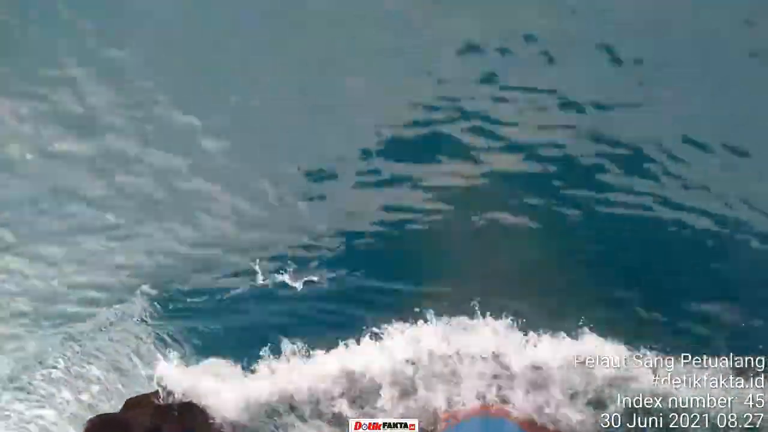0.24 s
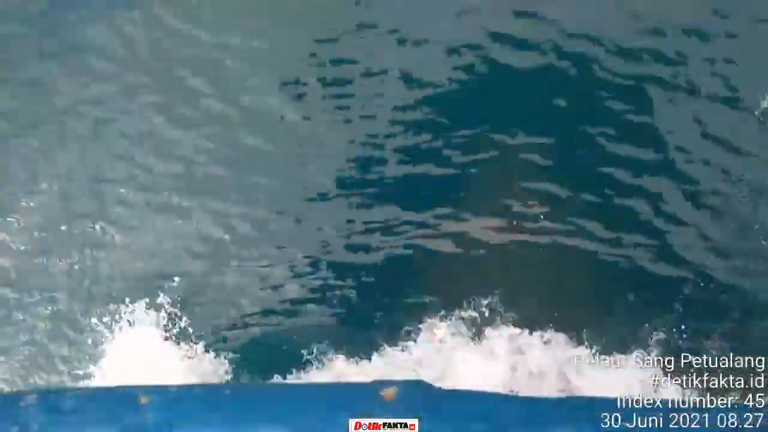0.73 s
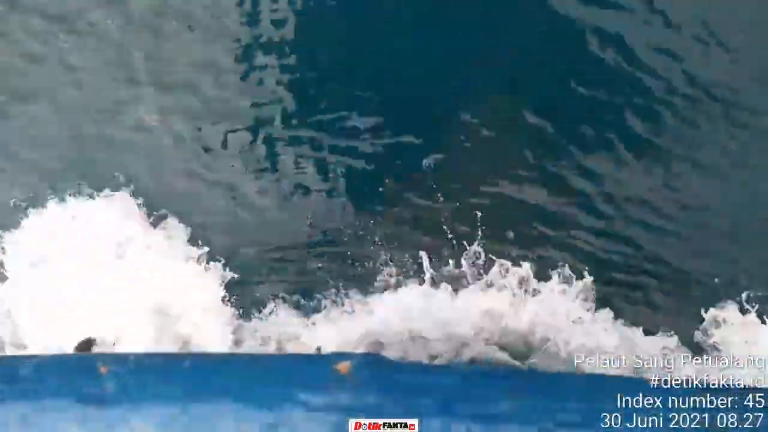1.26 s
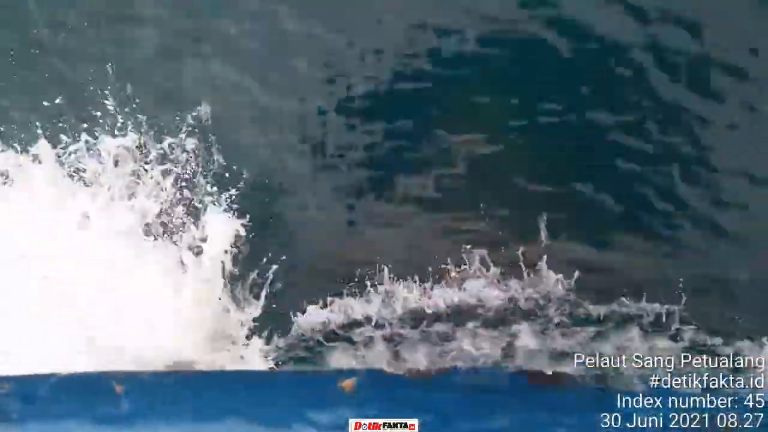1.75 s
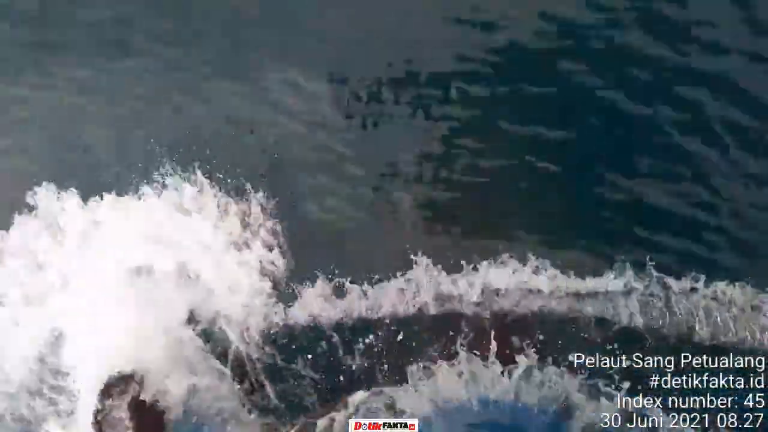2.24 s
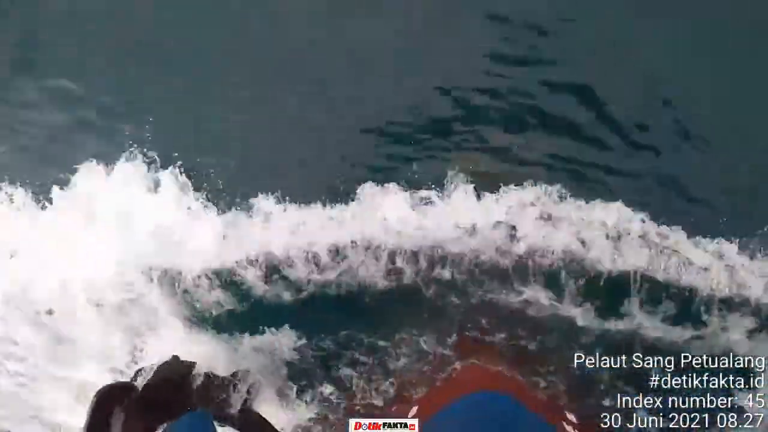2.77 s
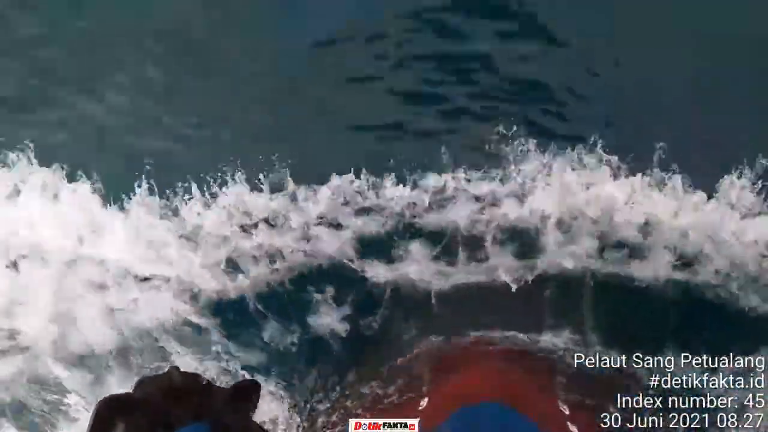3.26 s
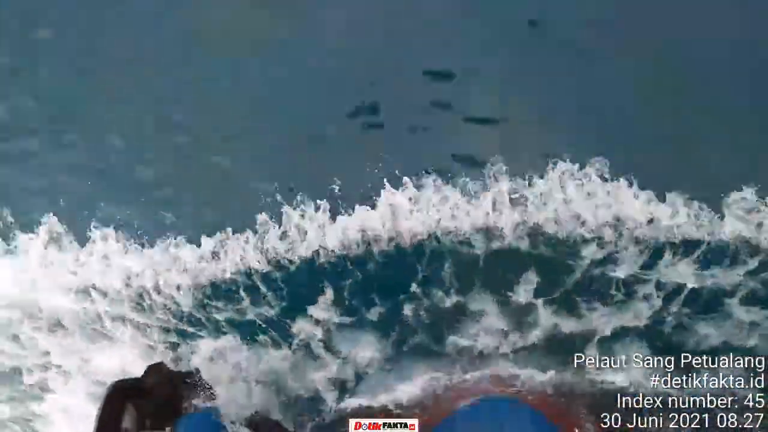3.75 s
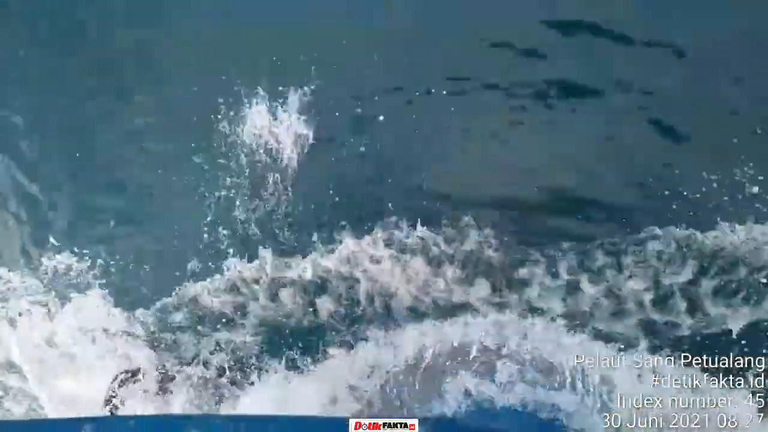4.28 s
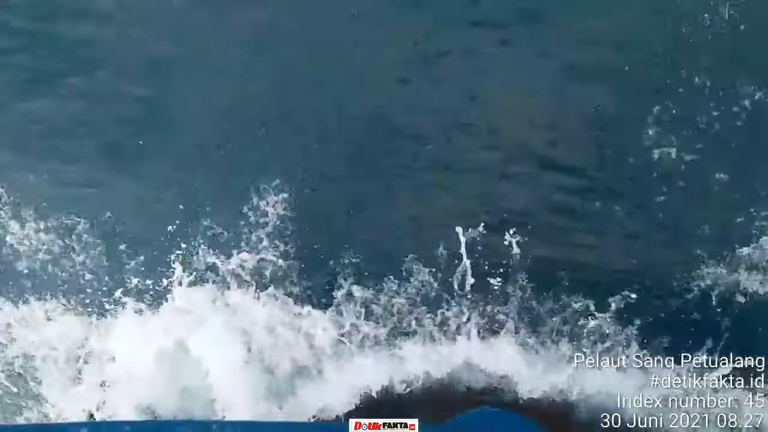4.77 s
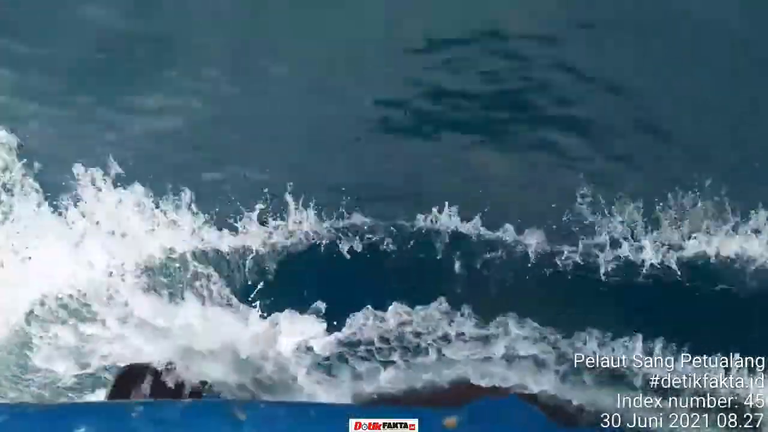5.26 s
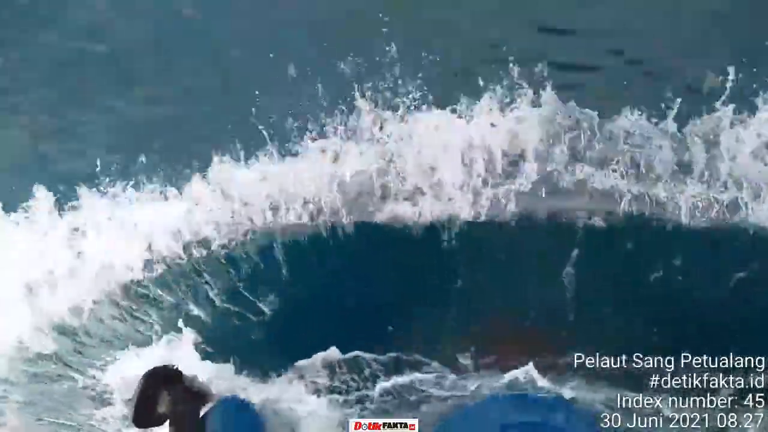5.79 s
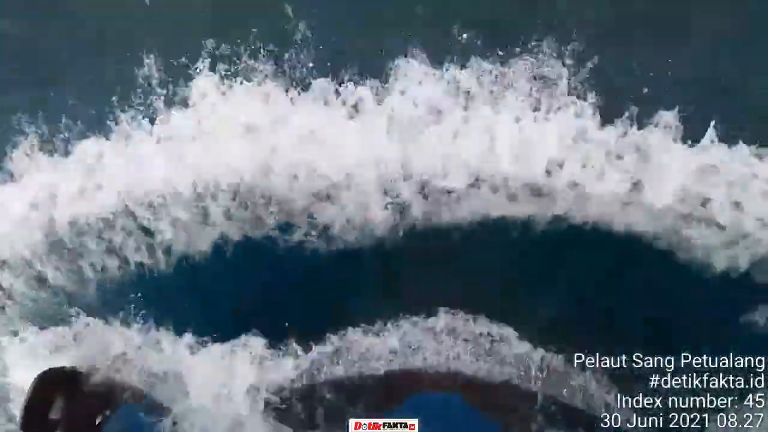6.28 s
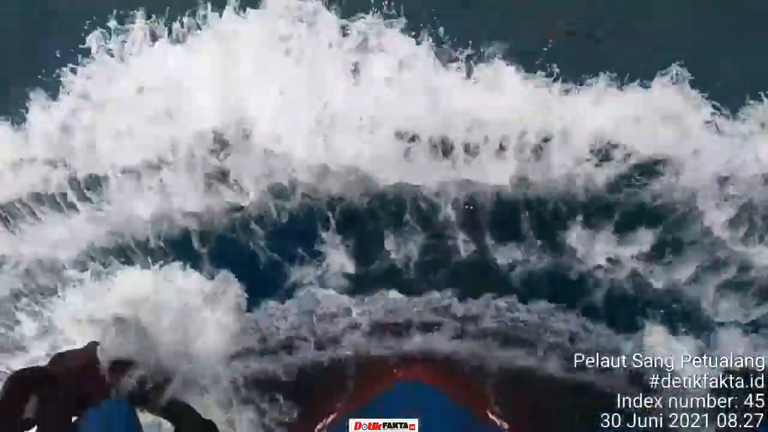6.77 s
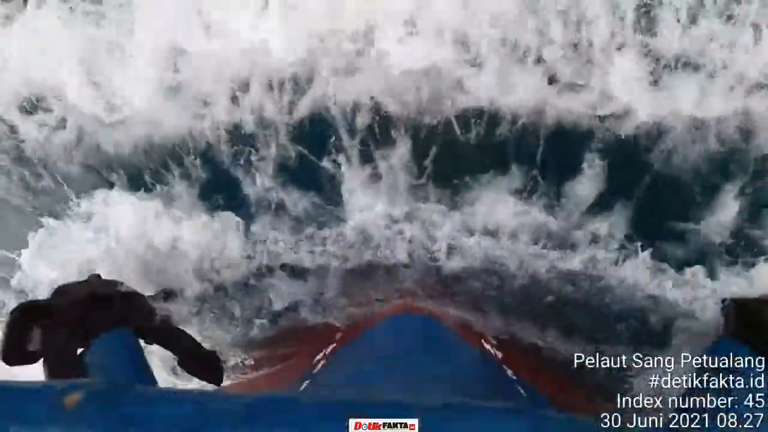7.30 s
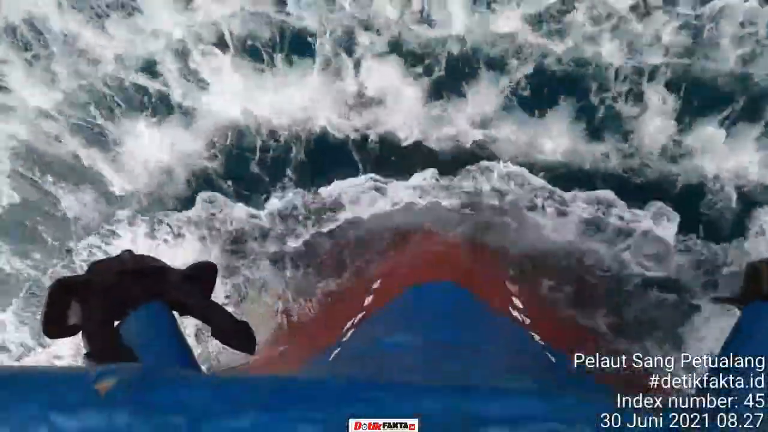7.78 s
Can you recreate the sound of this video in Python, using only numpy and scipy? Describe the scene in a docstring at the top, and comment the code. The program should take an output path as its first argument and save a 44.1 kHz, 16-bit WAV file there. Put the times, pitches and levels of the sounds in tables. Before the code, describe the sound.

Seen from the bow rail above the water, a ship ploughs ahead. A continuous foaming rush of churning water swells and eases, with bubbly slaps and bright spatters of spray, thickest near four seconds. Low wind buffets and thumps on the exposed microphone. A faint engine hum lies beneath, and tiny metallic rattles come just after five seconds and near the end.

```python
"""A foaming bow wave churns and rushes below a ship's bow, built from patchy noise and rising bubble tones.
Slaps of water ring as trapped bubbles, spray spatters in bright bursts, and a thin hiss rides high above.
Wind rumbles, buffets and thumps on the microphone as low coloured noise.
Far behind, the engine hums through the hull as wavering sines, and a small metal part rattles in ringing knocks."""
import sys
import numpy as np
from scipy import signal
from scipy.fft import rfft, irfft
from scipy.io import wavfile
from scipy.ndimage import uniform_filter1d

SR = 44100
rng = np.random.default_rng(int(sys.argv[2]) if len(sys.argv) > 2 else 0)


def boost(x):
    """Linear amplitude factor 10**(x/20) for a level x in decibels (scalar or array-like)."""
    u = np.asarray(x, float) / 20
    return 10 ** u


def wav_out(sig):
    """Save sig, one row per channel (or a flat mono array), as 16-bit PCM at SR to the path in sys.argv[1]."""
    wavfile.write(sys.argv[1], SR, np.round(np.clip(np.atleast_2d(sig).T, -1, 1) * 32767).astype(np.int16))


N = 354110  # length in samples

# slow heave of the bow: t/s, wave force level/dB, water fineness level/dB
BOW_HEAVE = [(0, -3.5, -1), (0.3, -1.5, -1), (0.9, -1, -1.5), (1.25, 0.5, 1.0), (1.7, -3, 0),
             (2.06, 1, 0.5), (2.25, -1.0, -3), (2.5, 0.5, 0), (2.85, 1.0, -1.0), (3.12, 0.5, 2),
             (3.25, -2.5, 3), (3.6, -5.5, 4), (3.78, -4.0, -0.5), (4.05, -2, 0.5), (4.35, 1.5, -3),
             (4.81, 2.5, 4), (4.86, 1, -1.5), (5.15, 1.0, -5), (5.55, 0, 1.5), (5.95, 2.0, 1.5),
             (6.6, 1.0, -0.5), (7.15, 0, 3.5), (7.45, -1, 0.5), (7.75, -3.5, 4), (8.03, -3.5, 1.5)]
# passing swells of the water noise, some louder, some only heavier or finer:
# peak t/s, length/s, added force level/dB, added fineness level/dB
WATER_SWELLS = [(0.183, 0.15, 3.0, -2.5), (0.466, 0.11, 1.5, 2), (0.662, 0.08, 2.5, -1),
                (0.797, 0.08, 1.5, -2.5), (1.047, 0.15, 2.5, -2), (1.453, 0.28, 2.5, -3.5),
                (1.65, 0.11, 1.0, -2.5), (1.807, 0.08, 1.5, -0.5), (2.11, 0.11, 1.5, 2.5),
                (2.35, 0.15, 1.5, 0), (2.65, 0.11, 1.5, -1.5), (3.03, 0.08, 1.5, -1.5),
                (3.482, 0.22, 1.5, -1.5), (3.685, 0.08, 3.5, 0), (3.81, 0.11, 0, 4), (3.897, 0.16, 4, -2.5),
                (4.28, 0.19, 0, 3), (4.614, 0.28, 1, -1), (5.033, 0.08, 1.0, -0.5), (5.25, 0.28, 1.5, 1.5),
                (5.682, 0.087, 1, -2), (5.932, 0.11, 1.0, 1.5), (6.14, 0.08, 0.5, -1.5),
                (6.36, 0.32, 1.5, 0.5), (6.483, 0.088, 1.5, -1.5), (6.687, 0.08, 1.5, 2),
                (6.873, 0.08, 1.5, -2.5), (7.06, 0.28, 2.5, -2.5), (7.67, 0.08, 1.5, -3.5),
                (7.8, 0.15, 1.0, 0.0)]
# how churn, rush, foam and spray follow the wave, one row each:
# level/dB with both controls at 0, slope on force/(dB per dB), slope on fineness/(dB per dB)
WATER_LAWS = [(-43.5, 0.98, -0.66), (-49, 1.06, -0.17), (-49.5, 1.12, 0), (-64, 1.54, 0.83)]
# froth, moving sound from the rush to the fizz of foam: t/s, level/dB
FROTH_DRIFT = [(0.0, 0.4), (0.45, 0.5), (0.9, 0), (1.3, 1.5), (1.55, -0.2), (2.05, 0.8), (2.4, -0.3),
               (3.0, 0.4), (3.35, 0.5), (3.85, 1), (4.0, -0.8), (4.4, 0.5), (4.75, 0.3), (5.1, 0.4),
               (5.45, -1.5), (5.95, 0.4), (6.5, -0.5), (6.85, 0.5), (7.3, 0.4), (7.7, -0.8), (8.03, -1.5)]
# colours of the water from heavy to fine, relative power per Hz: f/Hz, level/dB
CHURN_COLOUR = [(130, -40.5), (220, -1), (432, 2), (614, -0.5), (800, -18), (1040, -17.5), (1760, -120)]
RUSH_COLOUR = [(450, -59), (650, -1), (800, -4.5), (1250, -3), (1500, -8), (1900, -14.5), (2600, -29),
               (4000, -100)]
FOAM_COLOUR = [(900, -26), (1400, -7), (1900, -2), (2700, -2), (3250, -6), (3600, -12.5), (4200, -22.5),
               (5500, -35), (9000, -100)]
SPRAY_COLOUR = [(2290, -21), (3900, -6), (4350, -2.5), (5890, 0.5), (7040, -10), (9130, -23.5),
                (11000, -25.5), (14300, -43), (22000, -120)]
# slaps of water that trap a large bubble: t/s, level/dB, starting f/Hz
BUBBLE_SLAPS = [(1.066, -29, 613), (3.008, -35, 463), (3.71, -38, 440), (3.803, -31, 610),
                (3.816, -33, 557), (3.842, -33, 624), (3.85, -41, 640), (3.919, -31.5, 473),
                (4.169, -40, 520), (4.414, -34, 625), (4.555, -31, 547)]
# handfuls of spray that spatter close by: t/s, peak level/dB
SPRAY_SPATTERS = [(0.158, -57), (1.056, -51), (1.191, -53), (3.775, -57), (3.853, -53), (4.139, -54),
                  (4.337, -56), (4.56, -49), (4.62, -50), (4.698, -46), (4.81, -50), (5.663, -53),
                  (6.297, -51), (6.681, -54), (6.898, -53), (7.072, -51), (7.869, -55)]
# how the thin hiss follows the wave: level/dB with both controls at 0,
# slope on force/(dB per dB), slope on fineness/(dB per dB)
THIN_HISS_LAW = (-81, 1, 0.98)
# moments when the thin hiss swells or dips: peak t/s, length/s, added level/dB
HISS_SWELLS = [(2.95, 1.1, -1.5), (4.77, .12, 1), (5.21, 0.24, 7), (5.68, .1, 6), (5.94, 0.38, 4.5),
               (6.95, .4, 3)]
# slow wind on the microphone: t/s, strength level/dB, eddy smallness level/dB
WIND_DRIFT = [(0, -2.5, -5.5), (0.5, -7.5, 1.5), (1.1, -0.5, -1), (1.8, 0, -2.0), (2.35, -0.5, -2),
              (2.75, 0.5, -1.5), (3.25, -5.5, -2), (3.65, -9.5, -5.5), (4.1, 0.5, -2), (4.9, -4, 5),
              (5.5, -1.0, 6), (6.2, -5, -2.5), (6.9, -2, 1), (7.3, -8.5, -5.5), (7.6, -5.5, -6.5),
              (8.03, 4.5, 5)]
# passing rises in the low wind noise: peak t/s, length/s, added strength level/dB, added smallness level/dB
WIND_SWELLS = [(0.126, 0.13, 1, -0.5), (0.416, 0.12, 8, -3.5), (0.845, 0.51, 5, -5), (1.438, 0.12, 5, -0.5),
               (3.02, 0.22, 9, 1.5), (3.448, 0.12, 13.5, 2.5), (3.6, 0.27, 0.5, 4), (3.774, 0.11, 7.0, -3),
               (3.943, 0.11, 7, 4), (4.48, 0.094, 3.5, 1.0), (4.727, 0.42, 5, -4), (4.92, 0.14, 1.5, 2),
               (5.265, 0.12, 3, 2.5), (6.136, 0.14, 2.0, 3), (6.523, 0.4, 5.5, 2), (7.046, 0.15, 9, 0),
               (7.3, 0.11, 11, 4), (7.49, 0.12, 13, 3), (7.663, 0.14, 6.5, 8), (7.815, 0.36, 7.5, -1)]
# how slow pressure, rumble and buffeting follow the wind, one row each:
# level/dB with both controls at 0, slope on strength/(dB per dB), slope on smallness/(dB per dB)
EDDY_LAWS = [(-30.5, 1.14, -1.07), (-40, 1.5, 1), (-45, 0.21, 0.64)]
# colours of the wind, relative power per Hz: f/Hz, level/dB
PRESSURE_COLOUR = [(1, -42), (3, -18), (5.5, -5), (8, -2), (11, 2.5), (16, -6.5), (24, -9), (40, -29),
                   (80, -100)]
RUMBLE_COLOUR = [(8, -17), (18, -15), (30, 3), (50, -6), (80, -8.5), (130, -25), (250, -100)]
BUFFET_COLOUR = [(20, -20), (50, -39), (80, -7.5), (130, -9.5), (200, -12), (300, -35), (450, -87),
                 (700, -100)]
# thumps of wind on the microphone: t/s, peak level/dB, time scale/s, sharpness level/dB
WIND_THUMPS = [(2.814, -25, 0.021, -15), (2.989, -22.5, 0.025, -20), (3.039, -24, 0.036, -17),
               (3.432, -24.5, 0.031, -12), (4.418, -31, 0.025, -17), (4.462, -26, 0.021, -9),
               (4.531, -26.5, 0.037, -6), (5.281, -32, 0.024, -7), (6.121, -26.5, 0.052, -26),
               (7.032, -31, 0.035, -3), (7.674, -24.5, 0.036, -15), (7.832, -25, 0.047, -16),
               (7.907, -20.5, 0.026, -20), (7.969, -31, 0.023, 0)]
# engine hum: multiple of the firing rate, rms level/dB before wavering
ENGINE_ORDERS = [(1, -45.5), (1.5, -48), (2, -44), (2.5, -57), (3, -55), (3.5, -56.5)]
# knocks of the metal part: t/s, peak level/dB
METAL_KNOCKS = [(5.1711, -49), (5.1946, -50), (5.2074, -60), (5.2214, -60), (5.232, -54), (5.245, -50),
                (5.2774, -57), (5.3023, -64), (5.3244, -66), (5.3644, -69), (7.6294, -74), (7.6625, -68),
                (7.6794, -68), (7.7094, -69), (7.7333, -69), (7.7494, -69), (7.7852, -66)]
# ringing modes of the metal part: f/Hz, relative level/dB, t60/s
METAL_MODES = [(7000, -12, .012), (8200, 3, .016), (8500, 3, .016), (10500, -3, .01), (11300, -5, .012),
               (11500, -7, .012), (12200, -17, .008)]
# spells of trembling between knocks: t/s, length/s, starting rms level/dB, fall level/dB
METAL_TREMBLES = [(5.16, .28, -66, 15), (7.61, .26, -74, 5)]
# colour of the microphone's hiss above 1 kHz, relative power per Hz: f/Hz, level/dB
MIC_HISS_COLOUR = [(3000, -17), (7000, -7), (12000, -2), (16000, -1.5), (21000, -1)]


def evened(x):
    """Scales a sound to rms 1."""
    return x / np.sqrt(np.mean(x ** 2) + 1e-20)


def read(points, hz):
    """Reads a spectrum's dB at any frequency, in straight lines over log frequency."""
    f, value = np.transpose(points)
    return np.interp(np.log(hz + 0.091), np.log(f + 0.11), value)


def curve(rows, column):
    """One column of a breakpoint table, drawn as lines at every sample."""
    rows = np.array(rows)
    return np.interp(np.arange(N) / SR, rows[:, 0], rows[:, column])


def swells(rows, column):
    """Sums bells of the given column; each length is the full width at 1/e of the peak."""
    t = np.arange(0, N + 64, 64) / SR
    bells = sum(row[column] * np.exp(-4 * ((t - row[0]) / row[1]) ** 2) for row in rows)
    return np.interp(np.arange(N) / SR, t, bells)


def levels(slow, passing, laws):
    """Two controls, a slow drift plus passing swells, set the gain of each layer by its own law."""
    strong = curve(slow, column=1) + swells(passing, column=2)
    fine = curve(slow, column=2) + swells(passing, column=3)
    return [boost(db + a * strong + b * fine) for db, a, b in laws]


def add(mix, s, sound):
    """Lays a sound into the mix at s seconds, cut at the end."""
    part = mix[round(s * SR):][:len(sound)]
    part += sound[:len(part)]


def coloured(x, spectrum):
    """Filters a sound by a spectrum and evens it to rms 1."""
    hz = np.fft.rfftfreq(len(x), 1 / SR)
    return evened(irfft(rfft(x) * boost(read(spectrum, hz)), len(x)))


def wander(speed_hz):
    """Slow random drift of rms 1, rolled off above speed_hz and held near zero on average."""
    hz = np.fft.rfftfreq(N, 1 / SR)
    shape = hz / (hz + .5) / (1 + (hz / speed_hz) ** 2)
    return evened(irfft(rfft(rng.standard_normal(N)) * shape, N))


def patchy(spectrum, patchy_db, patch_hz, patch_s):
    """Random short-time spectra whose level drifts in patches of pitch and time."""
    frames, hz = N // 128 + 5, np.fft.rfftfreq(512, 1 / SR)
    a, b, patches = rng.standard_normal((frames, 257, 3)).T
    patches = uniform_filter1d(patches, max(round(patch_hz / hz[1]), 1), 0)
    patches = evened(uniform_filter1d(patches, max(round(patch_s * SR / 128), 1), 1))
    z = (a + 1j * b) * boost(patchy_db * patches)
    wash = signal.istft(z, nperseg=512, noverlap=384)[1][:N]
    return coloured(wash, spectrum)


def bubbles(per_s, low_hz, high_hz, cycles, spread_db):
    """Bursting pockets of air: short rising tones, most small, a few large."""
    bursts = rng.random(N) < per_s / SR
    size = boost(spread_db * np.minimum(rng.exponential(1, N), 5)) * bursts
    kind, out = rng.integers(0, 24, N), np.zeros(N)
    for k, hz in enumerate(np.geomspace(low_hz, high_hz, 24)):
        u = np.arange(round(3 * cycles * SR / hz)) * hz / (cycles * SR)
        tone = u * np.exp(-3 * u) * np.sin(2 * np.pi * cycles * u * (1 + 0.063 * u))
        out += signal.oaconvolve(size * (kind == k), tone / np.linalg.norm(tone))[:N]
    return evened(out)


def mixed(wash, grains, share):
    """Blends wash and grains, where share is the grains' part of the power."""
    share = np.clip(share, 0, 1)
    return np.sqrt(1 - share) * wash + np.sqrt(share) * grains


def bow_wave():
    """Four sizes of water share one flicker, as lumps of the wave land together."""
    landing = wander(25)
    churn = mixed(patchy(CHURN_COLOUR, 0.53, 250, 0.052), bubbles(300, 271.0, 718.5, 5.03, 3.6), 0.14)
    rush = mixed(patchy(RUSH_COLOUR, 0.31, 500, 0.03), bubbles(800, 765, 1733, 8.2, 3.9), 0.13)
    foam = mixed(patchy(FOAM_COLOUR, 1.0, 800, .04), bubbles(1500, 1690, 3560, 4.5, 1.9), 0.043)
    spray = mixed(patchy(SPRAY_COLOUR, 0.52, 2000, 0.018), bubbles(2500, 4900, 6200, 3.7, 4.3), 0.045)
    heavy, middle, light, finest = levels(BOW_HEAVE, WATER_SWELLS, WATER_LAWS)
    froth = boost(curve(FROTH_DRIFT, column=1))
    return (churn * heavy * boost(0.52 * landing)
            + rush * middle / froth * boost(0.36 * landing)
            + foam * light * froth * boost(0.24 * landing)
            + spray * finest * boost(0.75 * landing))


def slaps():
    """A splash of noise, while the trapped bubble rings and rises as it nears the surface."""
    t, out = np.arange(4000) / SR, np.zeros(N)
    splashes = rng.standard_normal((len(BUBBLE_SLAPS), len(t)))
    bubble_t60_s, splash_t60_s, attack_s = 0.057, 0.082, 0.00075
    for (s, db, hz), noise in zip(BUBBLE_SLAPS, splashes):
        bubble = np.sin(2 * np.pi * hz * t * (1 + 1.6 * t)) * boost(-60 * t / bubble_t60_s)
        splash = 0.23 * coloured(noise, RUSH_COLOUR) * boost(-60 * t / splash_t60_s)
        attack = 1 - np.exp(-t / attack_s)
        add(out, s, boost(db) * attack * (bubble + splash))
    return out


def spatters():
    """Short bright noise bursts with the colour of the spray, quick to rise and dying away."""
    t, out = np.arange(4096) / SR, np.zeros(N)
    drops = rng.standard_normal((len(SPRAY_SPATTERS), len(t)))
    t60_s, attack_s = .05, .0012
    envelope = boost(-60 * t / t60_s) * (1 - np.exp(-t / attack_s))
    for (s, db), noise in zip(SPRAY_SPATTERS, drops):
        burst = envelope * coloured(noise, SPRAY_COLOUR)
        add(out, s, burst / abs(burst).max() * boost(db))
    return out


def thin_hiss():
    """A narrow band of noise high above the spray, following the wave's force and fineness."""
    centre_hz, half_width_hz = 8830, 1000
    hz = np.fft.rfftfreq(N, 1 / SR)
    band = irfft(rfft(rng.standard_normal(N)) / (1 + ((hz - centre_hz) / half_width_hz) ** 2), N)
    level = levels(BOW_HEAVE, WATER_SWELLS, [THIN_HISS_LAW])[0]
    return evened(band) * level * boost(swells(HISS_SWELLS, column=2))


def wind():
    """Slow pressure swings, a rumble, lumpy buffeting above it, and single thumps."""
    large, medium, small = levels(WIND_DRIFT, WIND_SWELLS, EDDY_LAWS)
    out = coloured(rng.standard_normal(N), PRESSURE_COLOUR) * large
    out += coloured(rng.standard_normal(N), RUMBLE_COLOUR) * medium
    lumps = boost(2.8 * wander(6.7))
    out += evened(coloured(rng.standard_normal(N), BUFFET_COLOUR) * lumps) * small
    t = np.arange(8192) / SR
    air = rng.standard_normal((len(WIND_THUMPS), len(t)))
    for (s, db, length, sharp_db), noise in zip(WIND_THUMPS, air):
        u = t / max(length, .005)
        # small eddies sharpen the thump: f/Hz, level/dB
        eddy = [(12, -56), (50, 9.5), (120, 3.5 + sharp_db / 2), (350, sharp_db),
                (650, sharp_db - 31), (1300, -100)]
        puff = coloured(noise, eddy) * u * np.exp(-2.5 * u)
        add(out, s - .004, puff / abs(puff).max() * boost(db))  # starts 4 ms ahead
    return out


def engine():
    """Low orders of the firing rate, wavering on their way through the hull."""
    firing_hz, waver_db = 28.1, 3  # the rate drifts around firing_hz
    turns = np.cumsum(firing_hz * (1 + 0.007 * wander(1.0))) / SR
    out = np.zeros(N)
    for order, db in ENGINE_ORDERS:
        level = np.sqrt(2) * boost(db + waver_db * wander(12.0))
        out += level * np.sin(2 * np.pi * (order * turns + rng.random()))
    return out


def rattle():
    """Each knock can chatter and rings the same few modes; tiny touches fill the gaps."""
    t, out = np.arange(3000) / SR, np.zeros(N)
    ring = sum(boost(db - 60 * t / t60) * np.sin(2 * np.pi * hz * t) for hz, db, t60 in METAL_MODES)
    shape = (len(METAL_KNOCKS), 400)
    chatter = .45 * rng.standard_normal(shape) * (rng.random(shape) < .015)
    chatter[:, 0] = 1  # the first contact
    for (s, db), taps in zip(METAL_KNOCKS, chatter):
        knock = np.convolve(ring, taps)
        add(out, s, knock / abs(knock).max() * boost(db))
    shape = (len(METAL_TREMBLES), SR)
    touches = rng.standard_normal(shape) * (rng.random(shape) < 600 / SR)  # about 600 a second
    for (s, length, db, fall_db), row in zip(METAL_TREMBLES, touches):
        size = round(length * SR)
        fading = signal.windows.tukey(size, .3) * boost(np.linspace(db, db - fall_db, size))
        add(out, s, evened(signal.oaconvolve(row, ring))[:size] * fading)
    return out


def scene():
    """Sums the water, wind, engine and metal into one channel."""
    return (bow_wave() + slaps() + spatters() + thin_hiss() + wind() + engine() + rattle())[None]


def low_pass(x):
    """Removes everything above the highest recorded frequency."""
    return signal.sosfilt(signal.butter(12, 15710, fs=SR, output="sos"), x)


def record(dry):
    """The microphone adds its own faint hiss; both ends fade over a few milliseconds."""
    colour = [(1000, -66.5)] + MIC_HISS_COLOUR
    hiss = boost(-76.5) * coloured(rng.standard_normal(N), colour)
    fade = signal.windows.tukey(N, .01 * SR / N)  # 5 ms at each end
    return low_pass((dry + hiss) * fade)


dry = scene()
out = record(dry)
wav_out(out)
```